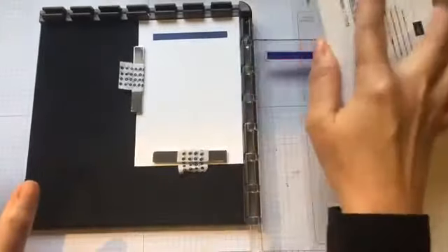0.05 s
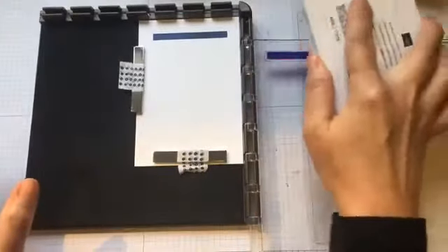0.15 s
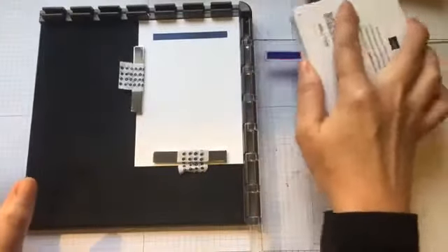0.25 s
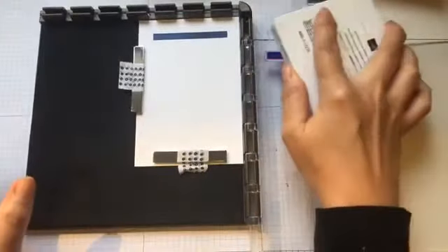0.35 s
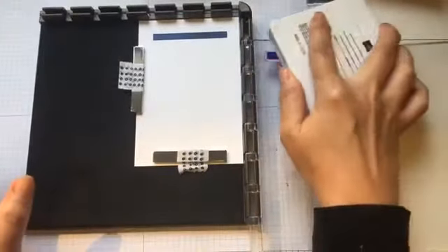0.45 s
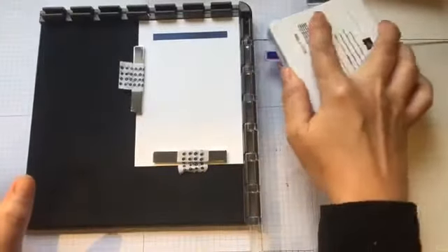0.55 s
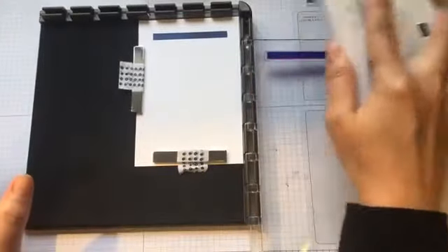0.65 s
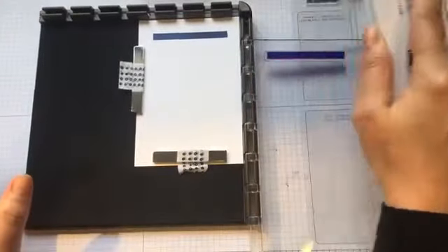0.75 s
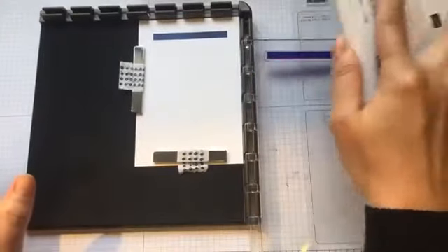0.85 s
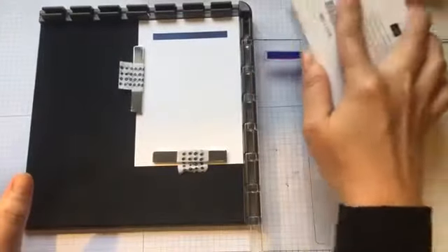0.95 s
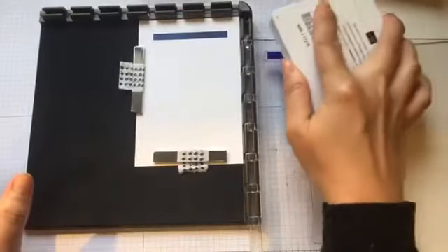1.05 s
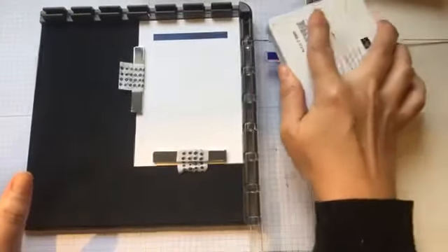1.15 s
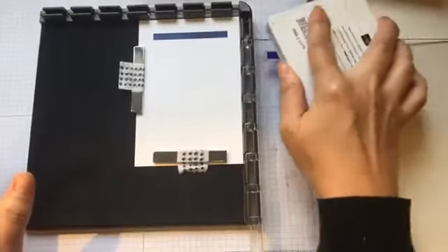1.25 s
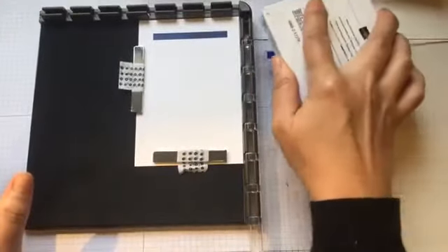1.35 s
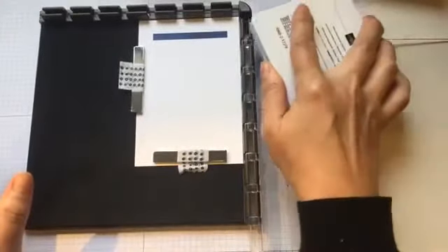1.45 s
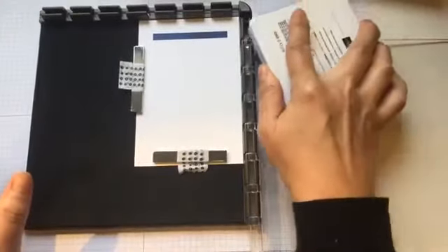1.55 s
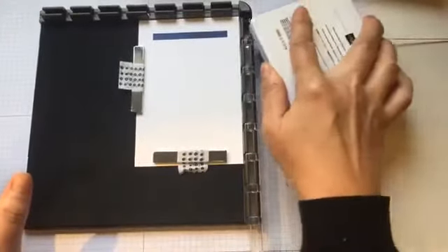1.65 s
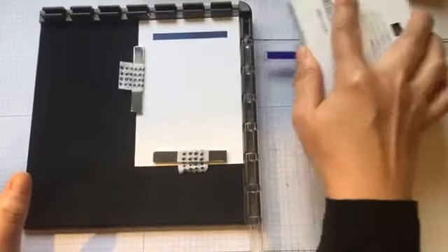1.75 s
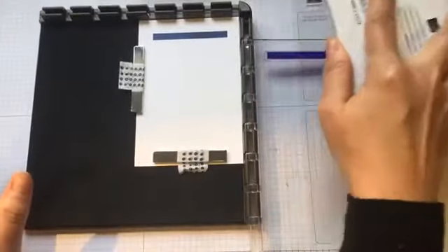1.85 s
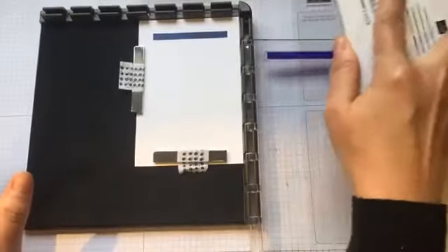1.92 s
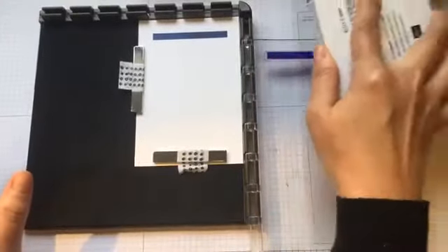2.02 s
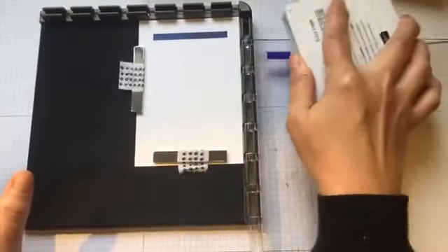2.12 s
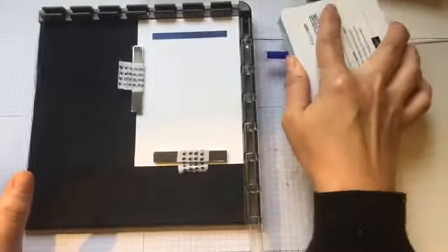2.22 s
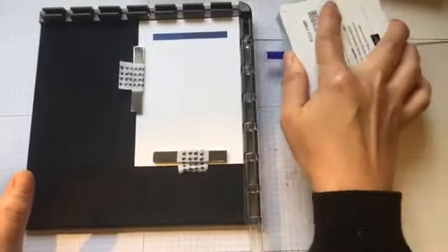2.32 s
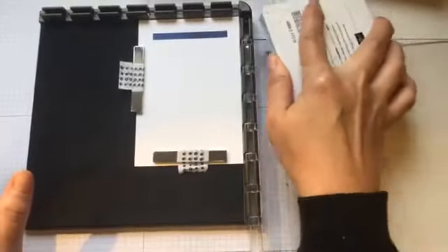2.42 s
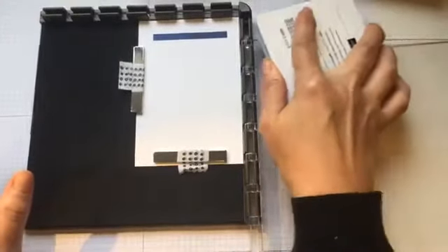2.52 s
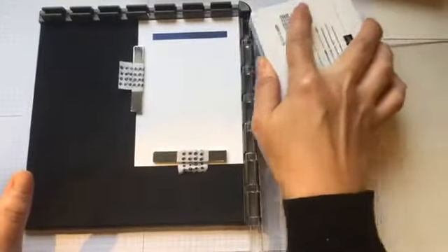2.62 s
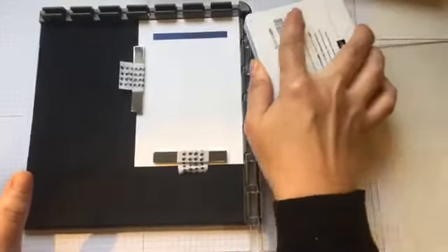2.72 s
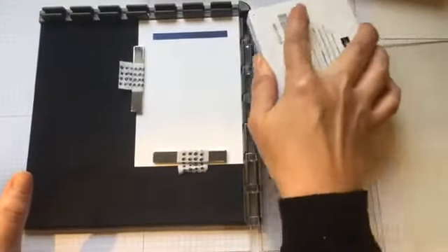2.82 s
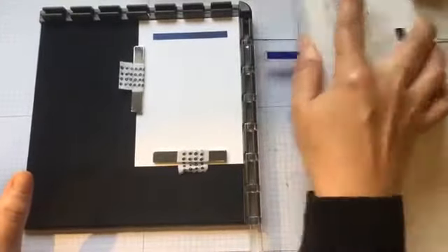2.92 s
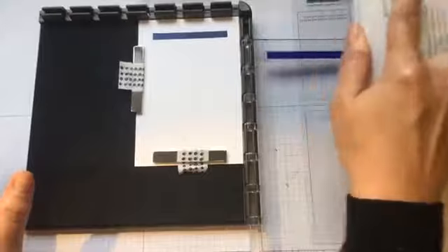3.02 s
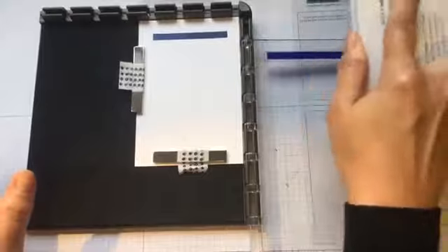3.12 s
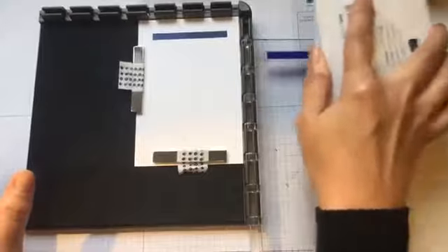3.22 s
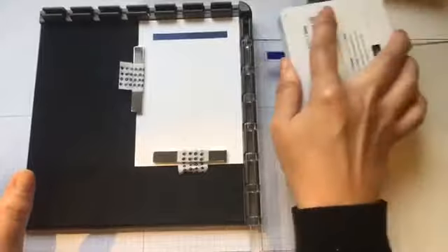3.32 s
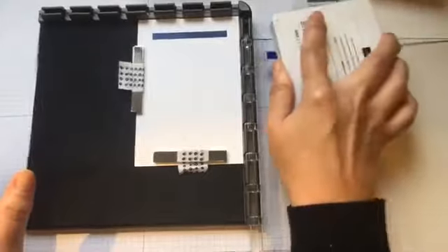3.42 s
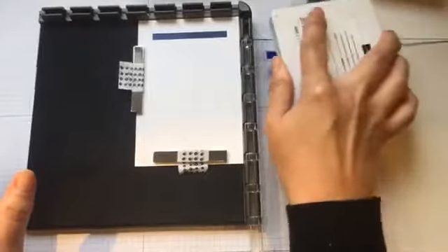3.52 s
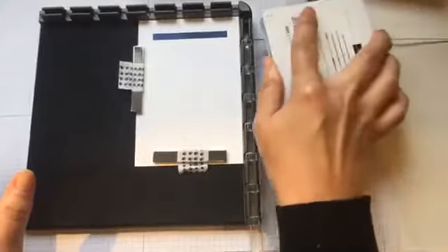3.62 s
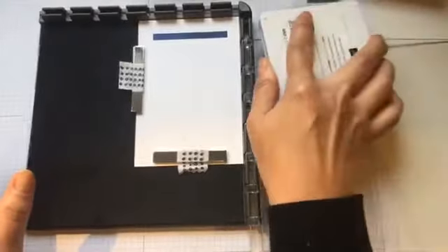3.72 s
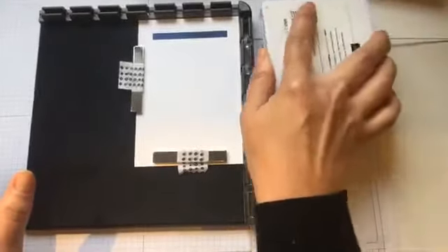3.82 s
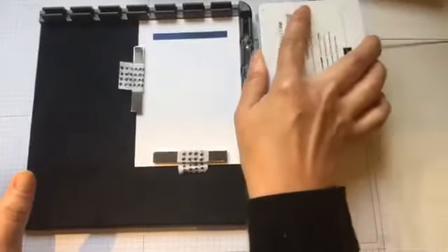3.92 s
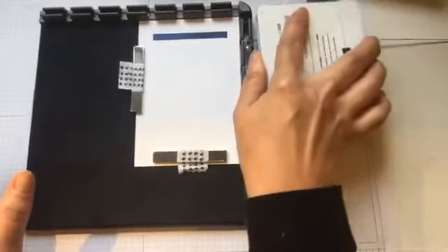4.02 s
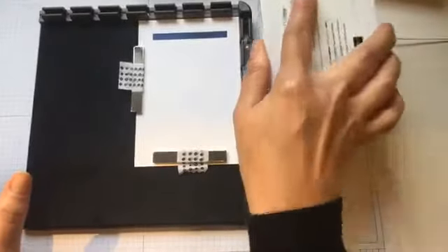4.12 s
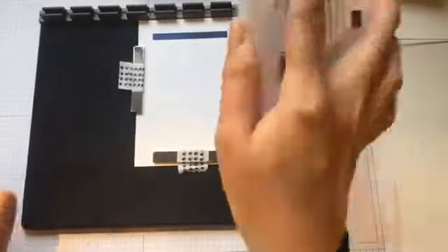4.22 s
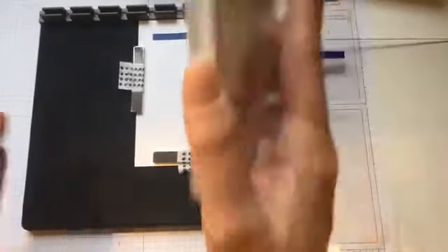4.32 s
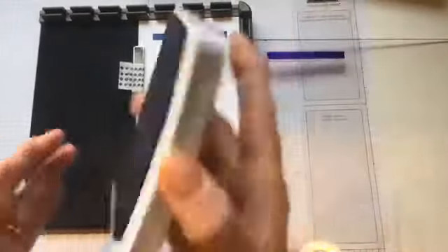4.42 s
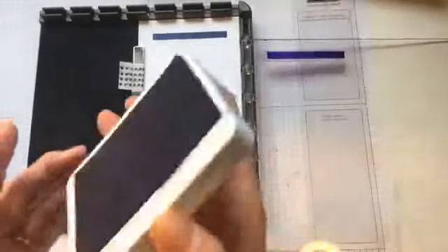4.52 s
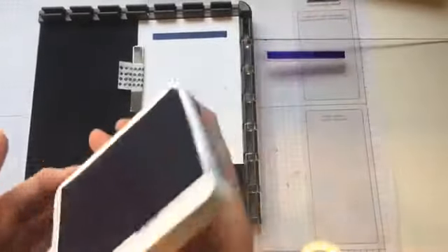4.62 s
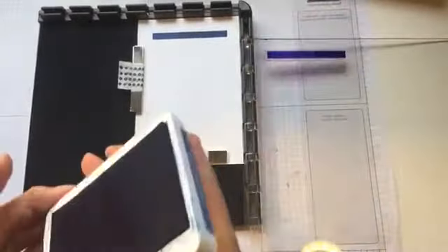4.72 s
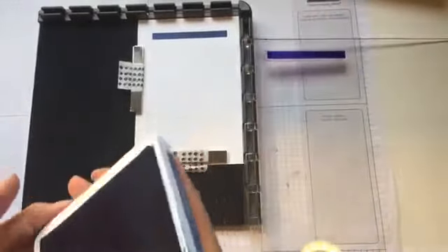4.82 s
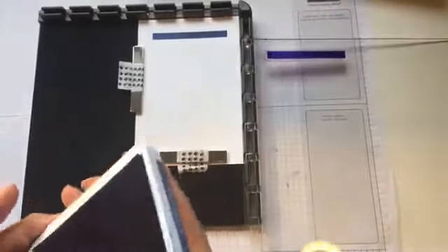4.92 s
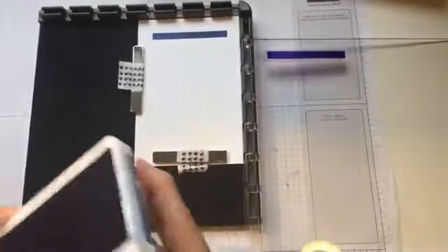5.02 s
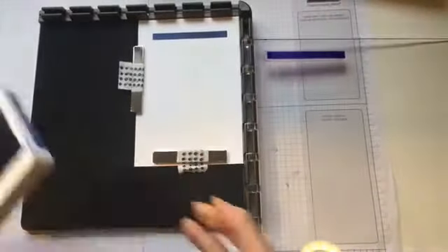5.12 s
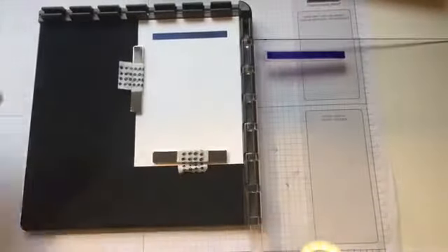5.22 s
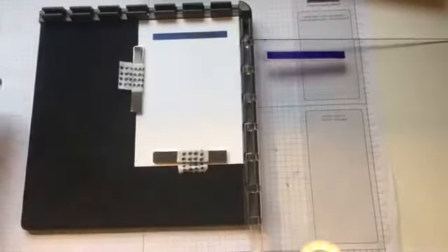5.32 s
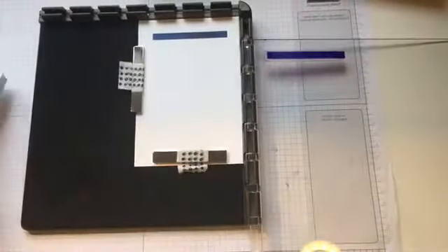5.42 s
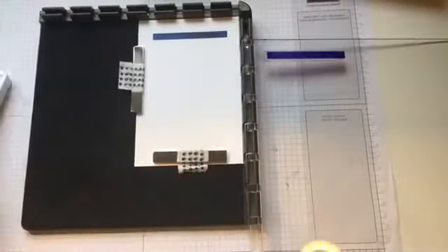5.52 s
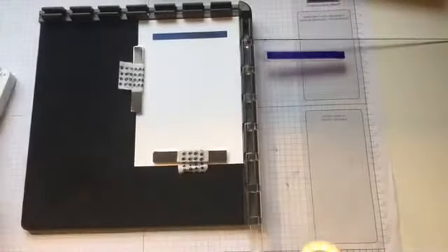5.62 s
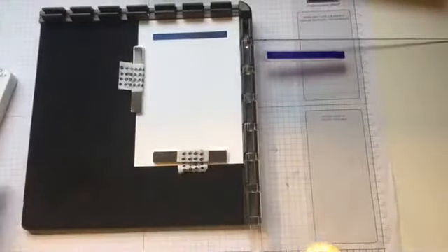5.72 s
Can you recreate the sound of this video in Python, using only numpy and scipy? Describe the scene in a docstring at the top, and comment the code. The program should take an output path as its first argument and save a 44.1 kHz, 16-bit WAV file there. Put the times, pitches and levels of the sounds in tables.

```python
"""A plastic ink pad taps face down on a stamp on a platform's lid, in three short groups, on a desk close by.
Felt noise leads each tap; ringing case modes and a crack make its knock, slow low modes the desk's thud.
Four times the tacky stamp lets go with a filtered noise click; twice the case catches the platform's edge.
Thin noise clicks tell of fingers; at last the pad is put down on its back, off to the side and farther away.
A small quiet room adds echoes, tails and a steady hush; the microphone thins the deep bass."""
import sys
import numpy as np
from scipy import signal
from scipy.fft import irfft, next_fast_len
from scipy.io import wavfile

SR = 44100
rng = np.random.default_rng(int(sys.argv[2]) if len(sys.argv) > 2 else 0)


def persist_wave(psi):
    """Save psi, clipped to +-1, as 16-bit WAV."""
    counts = np.round(np.clip(psi, -1, 1) * 32767).astype(np.int16)
    wavfile.write(sys.argv[1], SR, np.atleast_2d(counts).T)


N = 253927

# Faint steady hush of the place. Each row: frequency in Hz, relative level in dB per Hz.
HUSH_SPECTRUM = [(25, -7.5), (45, -0.5), (125, 0), (160, -5.5), (250, -3.5), (350, -9), (700, -15),
                 (860, -12.5), (1100, -18.5), (2500, -21), (6000, -27), (14000, -31.5)]
# The room's answer close by. Each row: frequency in Hz, relative level in dB per Hz.
ROOM_SPECTRUM = [(70, 5.5), (140, -3), (200, 3), (280, 5), (450, 0), (1000, -1.5), (1600, 0.5), (2400, -4),
                 (4000, -10.5), (5600, -18), (8000, -23.5), (14000, -23.5)]
# The room's answer to the farther spot. Each row: frequency in Hz, relative level in dB per Hz.
FAR_TAIL_SPECTRUM = [(100, 3), (280, 2), (450, -7), (700, -2), (1600, 0.5), (2400, -3), (3300, -6.5),
                     (4400, -16), (6000, -28.5), (14000, -35)]
# How long the room rings. Each row: frequency in Hz, time to fall 60 dB in seconds.
ROOM_T60 = [(100, 0.41), (250, 0.39), (600, 0.32), (1500, .29), (4000, 0.31), (8000, 0.3), (14000, .16)]
# Reflections from near surfaces. Each row: delay in seconds, level in dB against the direct sound.
NEAR_ECHOES = [(.0045, -17), (.0092, -19.5), (.0400, -27.5)]
# Edges in Hz of the noise bands that die at their own rates; the outer two bound all noise.
BAND_EDGES_HZ = [20, 200, 400, 800, 1600, 3200, 6400, 10000, 16000]

# Modes of the desk and platform. Each row: frequency in Hz, time to fall 60 dB in seconds, level in dB.
DESK_MODES = [(65.8, 0.2, -17), (101.5, 0.041, 8.5), (91.1, 0.21, -24.5), (135.1, 0.38, -20),
              (179.8, 0.21, -17), (265.2, 0.27, -16.5)]
# Rumble of the desk. Each row: frequency in Hz, relative level in dB per Hz.
RUMBLE_SPECTRUM = [(25, -1), (65, -4.5), (120, -4.5), (250, -12), (600, -45), (2000, -77)]
# Modes of the plastic case. Each row: frequency in Hz, time to fall 60 dB in seconds,
# then level in dB when struck on the rim, face, back and corner.
CASE_MODES = [ (274, 0.081, -10.5, -8, -7, -5.5), (341.5, 0.099, -8.5, -17.5, -15, -18),
              (505, 0.05, -2, -11, -18.5, -11), (615, .05, -18, -6, -3, 8), (690, .04, -15, -20, 0, -8),
              (815, .04, -18, -14, 1, 9), (922, 0.079, -3.5, -14, -16, -14),
              (1045, 0.061, -22.5, -1, -30.5, -14), (1125, 0.027, -2, -14, 4, -8),
              (1293, 0.021, -19.5, -9.5, 0, -21), (1491, 0.028, -16, -0.5, -7, 0),
              (1672, 0.042, -3, -8, 4.5, -4), (1976, 0.027, -26.5, -12, -15, -29),
              (2152, 0.027, -10.5, 0, -15.5, -20), (2660, 0.016, -7, -7.5, 1.5, -13),
              (2913, 0.015, 1, -5, -13.5, -20), (3825, .025, -13.5, -26.5, -13.5, -15),
              (5170, 0.014, -17.5, -19, -24.5, -3)]
# The crowd of short-lived modes in the plastic. Each row: frequency in Hz, relative level in dB per Hz.
CRACK_SPECTRUM = [(200, -7.5), (600, -3), (1500, -1), (2800, -5), (4000, -4.5), (5600, -5), (8000, -14.5),
                  (11000, -16), (14000, -11)]
# Their decay. Each row: frequency in Hz, time to fall 60 dB in seconds.
CRACK_T60 = [(200, 0.0438), (1500, 0.043), (5000, 0.015), (14000, 0.01)]
# The crack as heard from the farther spot. Each row: frequency in Hz, relative level in dB per Hz.
FAR_CRACK_SPECTRUM = [(200, -11.5), (450, -8.5), (900, 0.5), (1600, -2.5), (2200, -9), (3300, -3.5),
                      (3900, -5), (5600, -16), (8000, -17), (14000, -24)]
# Light click of case or stamp. Each row: frequency in Hz, relative level in dB per Hz.
CLICK_SPECTRUM = [(200, -36), (650, -1.5), (900, -5.5), (1250, 0), (1550, 6.5), (2000, -13), (2600, -11.5),
                  (4500, -11.5), (8000, -18.5), (13000, -10)]
# Its decay. Each row: frequency in Hz, time to fall 60 dB in seconds.
CLICK_T60 = [(600, 0.038), (1500, 0.026), (5000, 0.015), (14000, 0.0086)]
# Squash of the felt on the stamp. Each row: frequency in Hz, relative level in dB per Hz.
FELT_SPECTRUM = [(100, -0.5), (300, -5.5), (600, -0.5), (950, 1), (1300, -5), (2000, -13.5), (3000, -17.5),
                 (4500, -28), (12000, -44)]

# In the tables below, brightness is a treble tilt and the spot blends 0 rim, 1 face, 2 back, 3 corner.
# The case shifts in the fingers. Each row: start in seconds, level in dB, brightness in dB per octave.
FINGER_CLICKS = [(3.018, -66.5, 4), (4.4731, -43.5, .5), (5.0965, -56, -2.5)]
# The pad is laid on its back, off to the side. Each row: start in seconds, knock level in dB,
# brightness in dB per octave, desk thud level in dB, spot, room tail level in dB against the knock.
SET_DOWNS = [(5.5095, -37, 1.5, -65, 1.12, -19), (5.5810, -23.5, -0.5, -30, 2, -13.5)]
# The stamp lets go of the rising pad. Each row: start in seconds, click level in dB,
# click brightness in dB per octave, lid drop level in dB, treble limit of the drop in Hz.
LIFTS = [(0.6706, -48, 1, -38.5, 270), (1.3485, -38, -3, -44.5, 4500), (1.6734, -38.5, -1, -34, 300),
         (2.3976, -43, -6, -48, 500)]
# The pad catches the platform's edge. Each row: knock time in seconds, knock level in dB,
# brightness in dB per octave, treble limit in Hz, desk thud level in dB, spot.
EDGE_KNOCKS = [ (2.8019, -30, 0.5, 14000, -45, 2.86), (2.8107, -25.5, -4, 490, -29.5, 0.77),
               (2.8154, -34.5, 2, 10000, -30.5, 1.14), (2.8334, -37, -0.5, 6830, -36, 1.4),
               (4.0448, -23, 2.5, 3570, -37.5, 0.88)]
# The pad lands on the stamp. Each row: knock time in seconds, knock level in dB, brightness in dB per
# octave, desk thud level in dB, spot, rebound level in dB, felt level in dB before its doubling.
TAPS = [ (0.5021, -33, 0.2, -28, 0.74, -38.5, -46), (1.246, -21, 0.5, -22.5, 0.29, -38, -35),
        (1.5976, -23, -0.5, -24.5, 1.09, -36.5, -39.5), (2.2986, -24.5, -.5, -23, 1, -35.5, -37.5),
        (2.5733, -21.5, .5, -22, 0.082, -37, -39.5), (3.4978, -24.5, -.5, -20.5, 1.1, -35.5, -34.5),
        (3.768, -24.5, 0.57, -22.5, 1.1, -35, -36.5), (4.0431, -27, 1, -21, 1.48, -34, -32.5)]

BLOW_S, ROOM_S = .07, .4  # lengths of a blow and of a room or desk sound
CUTOFF_HZ = 14250  # top of the recorded band


def from_db(db):
    """Decibels to amplitude."""
    return 10 ** (np.asarray(db) / 20)


def at_hz(points, hz):
    """Read a table on a log-frequency axis."""
    freqs, values = np.transpose(points)
    return np.interp(np.log(hz), np.log(freqs), values)


def seconds(length_s):
    """Sample times from zero."""
    return np.arange(int(length_s * SR)) / SR


def dying(t, t60):
    """Exponential decay that falls 60 dB in t60 seconds."""
    return np.exp(-np.log(1000) * t / t60)


def swelling(t, rise_s):
    """Smooth exponential approach to full level."""
    return 1 - np.exp(-t / rise_s)


def add(track, s, sound):
    """Lay a sound into the track at a time."""
    start = round(s * SR)
    track[start:start + len(sound)] += sound[:len(track) - start]


def contact_colour(hz, bright_db, limit_hz):
    """A hard contact favours the treble; a long, soft one cannot excite it."""
    tilt = from_db(bright_db * np.log2(np.hypot(hz, 700) / 1400))  # flattens out below 700 Hz
    return tilt / np.hypot(1, (hz / limit_hz) ** 2)


def noise(t, spectrum, t60s=None, bright_db=0, limit_hz=np.inf):
    """Noise near rms 1 before contact colour and decay; with decay times, each band dies at its own rate."""
    size = next_fast_len(len(t), real=True)
    hz = np.maximum(np.arange(size // 2 + 1) * SR / size, 1)
    in_band = (hz > BAND_EDGES_HZ[0]) & (hz < BAND_EDGES_HZ[-1])
    gain = from_db(at_hz(spectrum, hz)) * in_band
    gain = gain / np.sqrt(np.mean(gain ** 2))
    gain = gain * contact_colour(hz, bright_db, limit_hz)
    random_phase = np.exp(2j * np.pi * rng.random(len(hz)))
    bins = gain * np.sqrt(size) * random_phase
    if t60s is None:
        return irfft(bins, size)[:len(t)]
    out = np.zeros(len(t))
    for low, high in zip(BAND_EDGES_HZ, BAND_EDGES_HZ[1:]):
        band = irfft(bins * ((hz >= low) & (hz < high)), size)[:len(t)]
        out += band * dying(t, at_hz(t60s, np.sqrt(low * high)))
    return out


def ring(t, hz, t60, level_db, rise_s):
    """Sines that swell and decay, neighbours swinging in opposite directions."""
    signs = (-1) ** np.arange(len(hz))
    sines = np.sin(2 * np.pi * hz[:, None] * t)
    swings = sines * dying(t, t60[:, None]) * swelling(t, rise_s)
    return (signs * from_db(level_db)) @ swings


def room_hush(level_db=-67.5):
    """The quiet place itself: steady coloured noise."""
    return from_db(level_db) * noise(np.arange(N) / SR, HUSH_SPECTRUM)


def room(dry, ring_on_db=-45, build_s=0.0034):
    """Near surfaces add early echoes; later ones carry each knock's own pitches on."""
    t = seconds(ROOM_S)
    nearly_flat = [(100, 0.0052), (14000, 0.0035)]  # Hz, dB per Hz
    build_up = 1 - np.exp(-(t / build_s) ** 2)
    response = from_db(ring_on_db) * noise(t, nearly_flat, ROOM_T60) * build_up
    response[0] += 1  # direct sound
    for delay_s, level_db in NEAR_ECHOES:
        add(response, delay_s, from_db([level_db]))
    return signal.fftconvolve(dry, response)[:N]


def room_tail(spectrum, bright_db, limit_hz=np.inf, build_s=0.0043):
    """Sound thrown in all directions comes back as a smooth, diffuse tail."""
    t = seconds(ROOM_S)
    build_up = 1 - np.exp(-(t / build_s) ** 2)
    return noise(t, spectrum, ROOM_T60, bright_db, limit_hz) * build_up


def desk_bump(swing_hz=90, t60=.1, rise_s=0.013):
    """A slow push only sways the desk, without making it rumble."""
    t = seconds(ROOM_S)
    return np.sin(2 * np.pi * swing_hz * t) * dying(t, t60) * swelling(t, rise_s)


def desk_thud(rise_s=0.0066, scatter_db=1.0, rumble_db=-23, rumble_t60=0.36):
    """The heavy desk takes a moment to swing, then hums and rumbles briefly."""
    t = seconds(ROOM_S)
    hz, t60, level_db = np.transpose(DESK_MODES)
    rumble = noise(t, RUMBLE_SPECTRUM) * dying(t, rumble_t60) * swelling(t, rise_s)
    level_db = level_db + scatter_db * rng.standard_normal(len(hz))
    return ring(t, hz, t60, level_db, rise_s) + from_db(rumble_db) * rumble


def settling(count=3, spacing_s=.066, unevenness=0.16, start_db=-9.5, fade_db_per_s=-70.5):
    """After each tap the desk settles under the hand in a few uneven, fading bumps."""
    out = np.zeros(N)
    for s, _, _, thud_db, *_ in TAPS:
        gaps_s = spacing_s * (1 + unevenness * rng.uniform(-1, 1, count))
        for after_s in np.cumsum(gaps_s):
            level_db = thud_db + start_db + fade_db_per_s * after_s
            add(out, s + after_s, from_db(level_db) * desk_bump())
    return out


def finger_clicks(room_db=-30):
    """Held in the fingers, the case clicks thinly, with no desk under it."""
    out = np.zeros(N)
    for s, level_db, bright_db in FINGER_CLICKS:
        click = noise(seconds(BLOW_S), CLICK_SPECTRUM, CLICK_T60, bright_db)
        add(out, s, from_db(level_db) * click)
        add(out, s, from_db(level_db + room_db) * room_tail(ROOM_SPECTRUM, bright_db))
    return out


def case_knock(bright_db, limit_hz, spot, crack_spectrum, rise_s=0.00068, travel_s=0.001413,
               crack_db=-1.5, crack_rise_s=0.00046, scatter_db=0.5):
    """The spot that lands decides which modes of the case speak; a crack leads them."""
    t = seconds(BLOW_S)
    hz, t60, *by_spot = np.transpose(CASE_MODES)
    # blend the levels in dB of the two nearest spots
    spot = np.clip(spot, 0, len(by_spot) - 1)
    shares = np.maximum(1 - abs(spot - np.arange(len(by_spot))), 0)
    level_db = shares @ np.array(by_spot) + scatter_db * rng.standard_normal(len(hz))
    level_db = level_db + 20 * np.log10(contact_colour(hz, bright_db, limit_hz))
    # bending waves travel slower at low pitch, so the low modes start later
    arrival_s = travel_s * np.sqrt(np.median(hz) / hz)
    age = np.maximum(t - arrival_s[:, None], 0)
    body = ring(age, hz, t60, level_db, rise_s)
    crack = noise(t, crack_spectrum, CRACK_T60, bright_db, limit_hz) * swelling(t, crack_rise_s)
    return body + from_db(crack_db) * crack


def contact(knock_db, bright_db, limit_hz, spot, room_db):
    """One close knock of the case, its room tail set against the knock."""
    sound = from_db(room_db) * room_tail(ROOM_SPECTRUM, bright_db, limit_hz)
    add(sound, 0, case_knock(bright_db, limit_hz, spot, CRACK_SPECTRUM))
    return from_db(knock_db) * sound


def set_down():
    """A light touch on the desk, then the back claps down; farther off, it sounds duller and roomier."""
    out = np.zeros(N)
    for s, knock_db, bright_db, thud_db, spot, room_db in SET_DOWNS:
        add(out, s, from_db(thud_db) * desk_thud())
        add(out, s, from_db(knock_db) * case_knock(bright_db, np.inf, spot, FAR_CRACK_SPECTRUM))
        add(out, s, from_db(knock_db + room_db) * room_tail(FAR_TAIL_SPECTRUM, bright_db))
    return out


def lifts(click_limit_hz=2010, drop_s=.007, drop_bright_db=-2.0, drop_spot=0.83, drop_room_db=-31,
          drop_thud_db=-39):
    """The tacky stamp comes free with a dull click, and the lid under it drops back onto the desk."""
    out = np.zeros(N)
    for s, click_db, bright_db, drop_db, limit_hz in LIFTS:
        click = noise(seconds(BLOW_S), CLICK_SPECTRUM, CLICK_T60, bright_db, click_limit_hz)
        add(out, s, from_db(click_db) * click)
        add(out, s + drop_s, contact(drop_db, drop_bright_db, limit_hz, drop_spot, drop_room_db))
        add(out, s + drop_s, from_db(drop_thud_db) * desk_bump())
    return out


def edge_knocks(push_lead_s=0.0028, room_db=-19.5):
    """Close, hard knocks of the case on the platform, some bright, some dull."""
    out = np.zeros(N)
    for s, knock_db, bright_db, limit_hz, thud_db, spot in EDGE_KNOCKS:
        add(out, s - push_lead_s, from_db(thud_db) * desk_thud())
        add(out, s, contact(knock_db, bright_db, limit_hz, spot, room_db))
    return out


def felt_squash(swell_s=0.0029, t60=0.062):
    """A short, dull squash of doubled noise that runs into the knock."""
    t = seconds(BLOW_S)
    return noise(t, FELT_SPECTRUM) * 2 * swelling(t, swell_s) * dying(t, t60)


def taps(felt_lead_s=.0104, push_lead_s=0.0024, limit_hz=13000, room_db=-19.5,
         rebound_s=.0187, rebound_limit_hz=6100, rebound_spot=0.91, rebound_room_db=-24):
    """The felt touches, the desk is pushed, the case knocks and rebounds once, weaker and duller, near the face."""
    out = np.zeros(N)
    for s, knock_db, bright_db, thud_db, spot, rebound_db, felt_db in TAPS:
        add(out, s - felt_lead_s, from_db(felt_db) * felt_squash())
        add(out, s - push_lead_s, from_db(thud_db) * desk_thud())
        add(out, s, contact(knock_db, bright_db, limit_hz, spot, room_db))
        rebound = contact(rebound_db, bright_db, rebound_limit_hz, rebound_spot, rebound_room_db)
        add(out, s + rebound_s, rebound)
    return out


def scene():
    """The pad in the room, over a faint steady hush."""
    hush = room_hush()
    pad = settling() + finger_clicks() + set_down() + lifts() + edge_knocks() + taps()
    return (room(pad) + hush)[None]


def record(dry, low_cut_hz=42):
    """The microphone loses the deep bass; the top is cut steeply."""
    low_cut = signal.butter(2, low_cut_hz, "high", fs=SR, output="sos")
    top_cut = signal.ellip(10, .3, 70, CUTOFF_HZ, fs=SR, output="sos")  # .3 dB ripple, 70 dB stopband
    return signal.sosfilt(top_cut, signal.sosfilt(low_cut, dry))


dry = scene()
out = record(dry)
persist_wave(out)
```